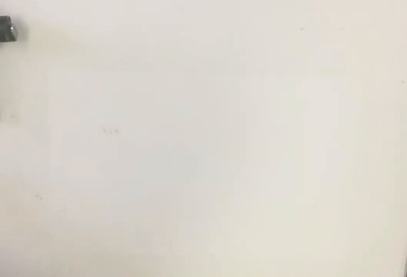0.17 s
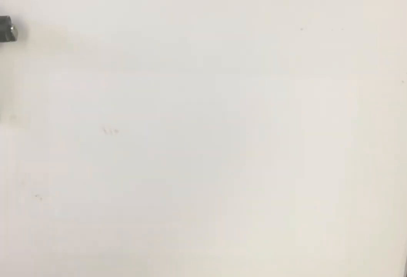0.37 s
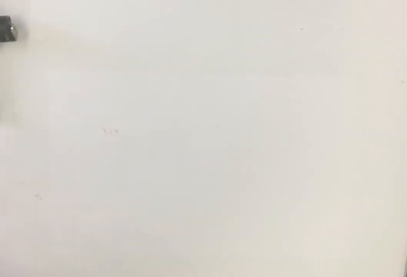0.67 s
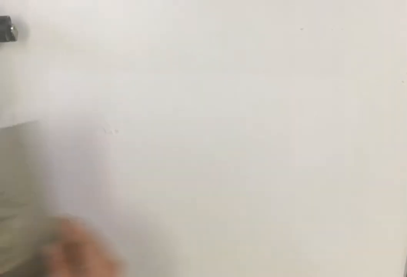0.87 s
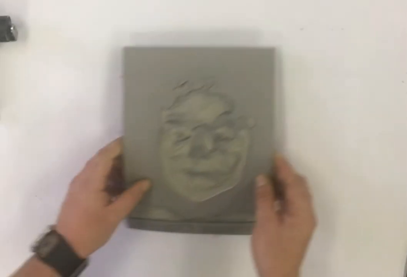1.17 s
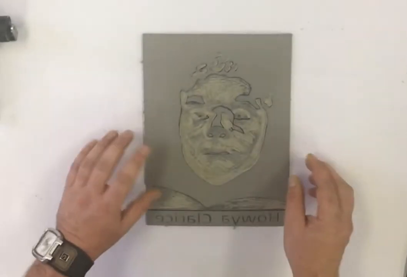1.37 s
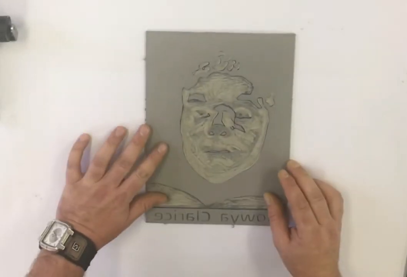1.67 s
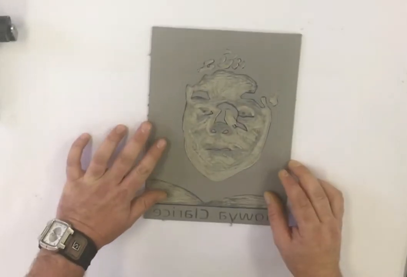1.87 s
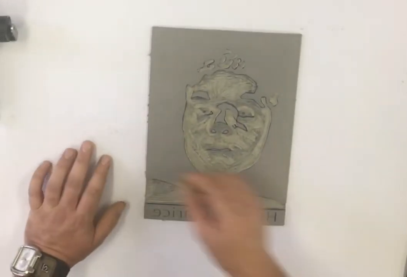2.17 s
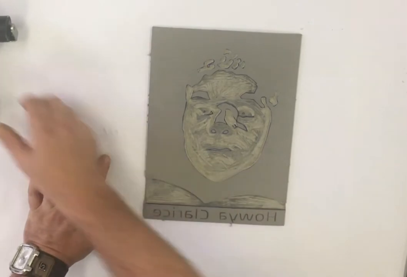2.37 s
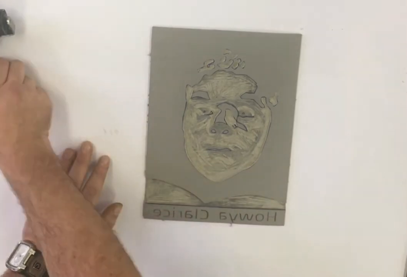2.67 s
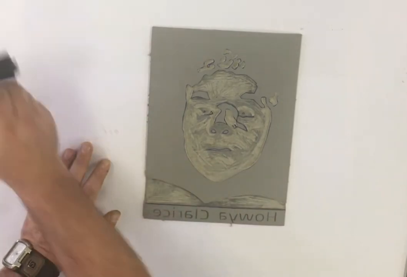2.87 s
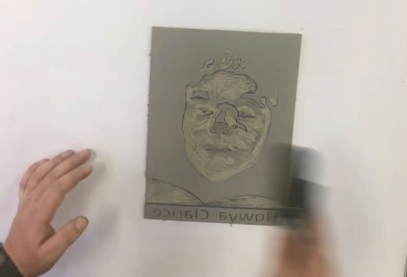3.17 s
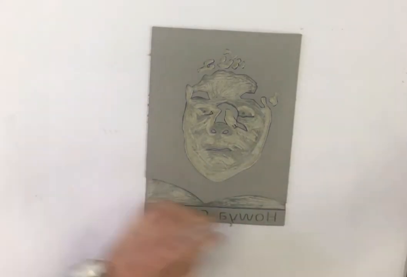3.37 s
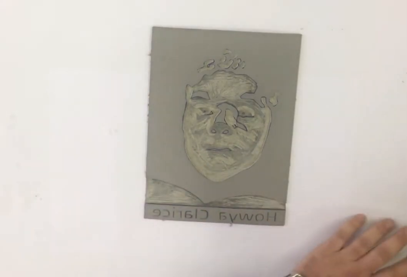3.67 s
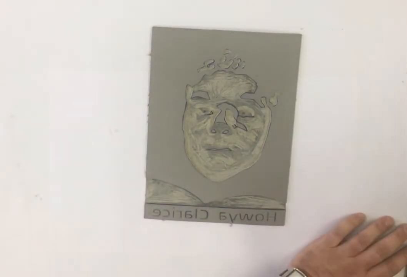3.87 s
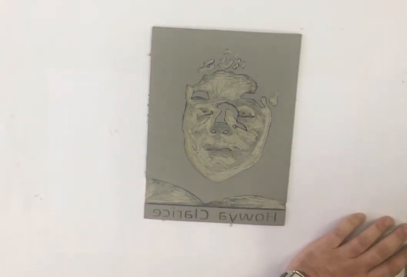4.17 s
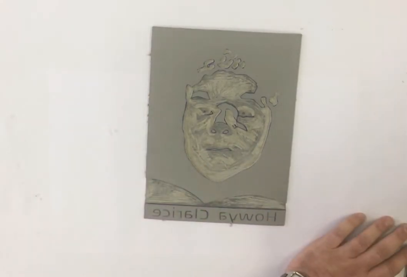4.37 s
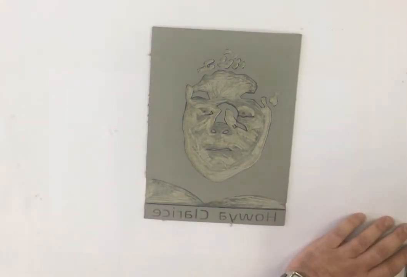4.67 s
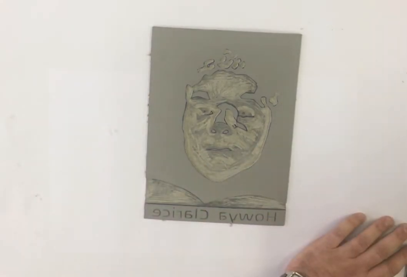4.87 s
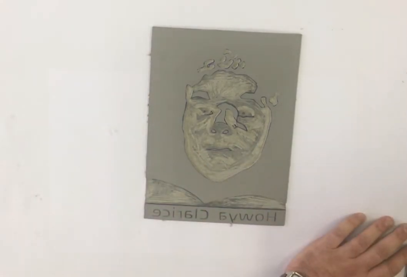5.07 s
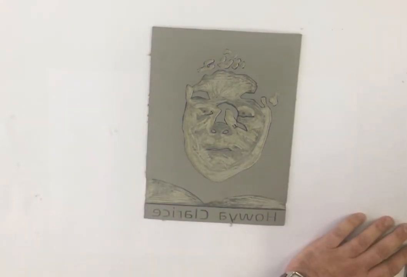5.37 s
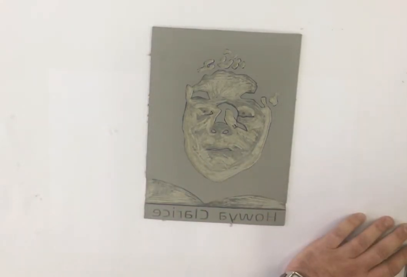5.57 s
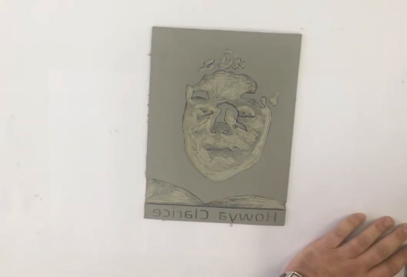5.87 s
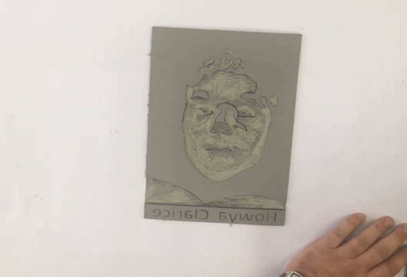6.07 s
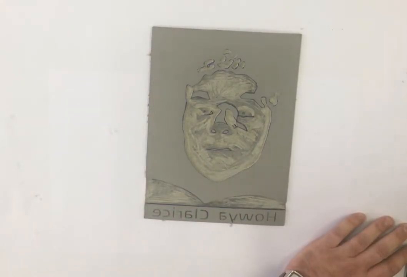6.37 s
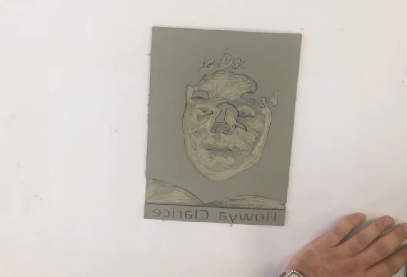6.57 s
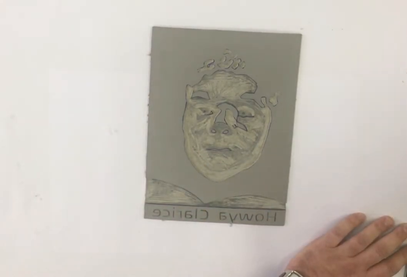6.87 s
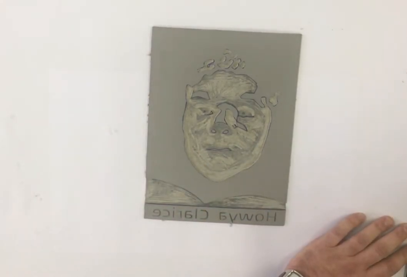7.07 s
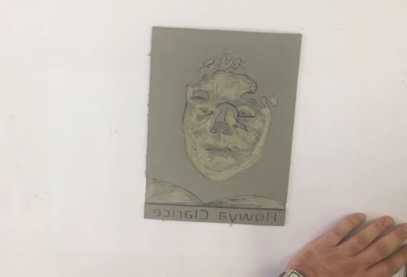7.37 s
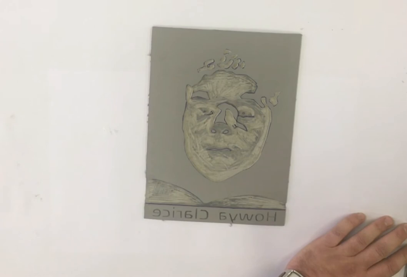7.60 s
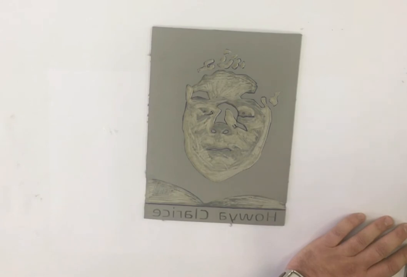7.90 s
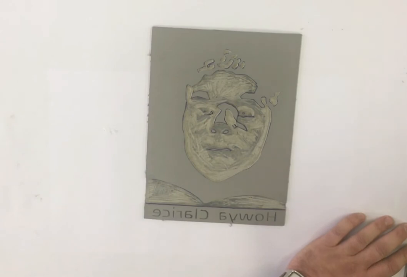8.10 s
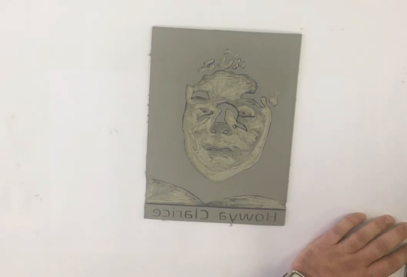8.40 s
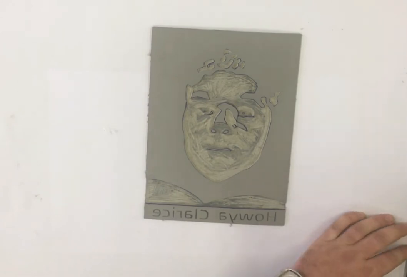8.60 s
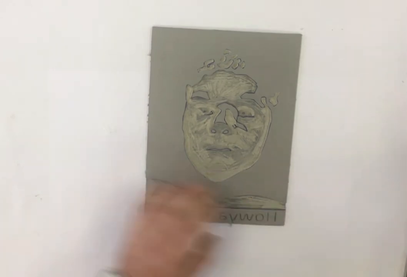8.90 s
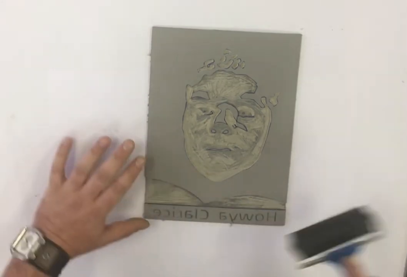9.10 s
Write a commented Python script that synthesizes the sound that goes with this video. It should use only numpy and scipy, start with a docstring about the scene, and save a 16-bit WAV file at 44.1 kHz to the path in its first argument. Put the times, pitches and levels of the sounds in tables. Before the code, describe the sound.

After a ringing metal clack and a soft flop on a workbench, a rubber roller knocks down and rolls through tacky ink in quick strokes.

```python
"""Rolling out printing ink.

A steel tool clacks onto a workbench and rings in its modes. A carved lino plate slides onto paper and
flops flat on a cushion of air. A rubber roller lands on the inking slab and rolls to and fro: threads
of tacky ink snap behind it in a fine sizzle, while its frame murmurs in forced vibration.
One microphone hears it all in a small, live room."""
import sys
import numpy as np
from scipy import signal
from scipy.fft import rfft, irfft, next_fast_len
from scipy.io import wavfile
from scipy.ndimage import map_coordinates

SR = 44100
rng = np.random.default_rng(int(sys.argv[2]) if len(sys.argv) > 2 else 0)


def store_pcm(level_fs):
    """Save levels as 16-bit WAV."""
    pcm = np.round(np.clip(level_fs, -1, 1) * 32767).astype(np.int16)
    wavfile.write(sys.argv[1], SR, np.atleast_2d(pcm).T)


N = 407484
TIME = np.arange(N) / SR
AGE = np.arange(SR) / SR  # time since a blow [s]

# pushes and pulls of the roller in turn, a push first: (start [s], fastest point [s], rest [s],
# relative sizzle level at the start [dB], at the fastest point [dB])
STROKES = [(3.579, 3.65, 3.76, -45.5, -45.0), (3.67, 3.85, 3.92, -41.0, -40.5),
           (3.948, 4.1, 4.14, -37.0, -34.5), (4.157, 4.28, 4.35, -41.0, -37.5),
           (4.377, 4.54, 4.62, -36.0, -35.5), (4.627, 4.69, 4.86, -49.5, -37.5),
           (4.852, 4.98, 5.06, -42.5, -32.0), (5.075, 5.15, 5.31, -51.5, -38.5),
           (5.301, 5.43, 5.5, -45.0, -30.5), (5.578, 5.63, 5.75, -49.0, -35.5),
           (5.764, 5.86, 5.95, -47.0, -32.0), (5.97, 6.04, 6.22, -52.0, -34.5),
           (6.227, 6.38, 6.46, -39.0, -32.5), (6.537, 6.62, 6.85, -48.5, -39.5),
           (6.89, 7.05, 7.12, -39.0, -34.0), (7.445, 7.62, 7.74, -55.0, -42.0),
           (7.74, 7.83, 7.99, -48.5, -35.0), (8.012, 8.16, 8.27, -47.0, -38.5),
           (8.287, 8.38, 8.56, -45.0, -34.0), (8.566, 8.66, 8.78, -54.0, -41.0)]
# spectrum of tacky contact parting: (frequency [Hz], relative density [dB])
TACK_SPECTRUM = [(300, -33.5), (1500, -23), (3000, -17), (4400, -7.5), (5000, -11.5), (6400, -2.5),
                 (7400, -6.5), (9500, -0.5), (10300, -4), (11300, 0.5), (13500, -2.5), (16000, -9.5)]


def rolling(set_off_s=0.012, slowing_db=19, slowing_power=2.03, sag_s=0.022):
    """Amplitude envelope of the sizzle: it follows the roller's speed, building up and falling away."""
    # brief dips within a stroke: (time [s], level change [dB])
    sags = [(3.81, -5.5), (4.04, -4), (4.27, -5), (4.46, -3.5), (6.11, -6.5), (6.31, -5.5), (6.73, -6),
            (6.98, -9.0)]
    strength = np.zeros(N)
    for start, fastest, rest, start_db, fastest_db in STROKES:
        set_off = 1 - np.exp(-np.maximum(TIME - start, 0) / set_off_s)
        build_db = np.interp(TIME, [start, fastest], [start_db, fastest_db])
        slowing = np.clip((TIME - fastest) / (rest - fastest), 0, 10)
        strength += set_off * amp(build_db - slowing_db * slowing ** slowing_power)
    return strength * amp(sum(db * bump(s, sag_s) for s, db in sags))


def ink(sizzle, echo_db=-17, echo_s=0.000402):
    """Shot noise: ink threads snap behind the roller, and faster rolling breaks more of them."""
    speed = np.sqrt(sizzle / sizzle.max())
    threads = coloured(snaps(7000 + 16000 * speed), TACK_SPECTRUM)
    # comb filtering: the reflection off the slab shifts as the roller travels
    lag = echo_s * SR * np.exp(0.286 * wobble(4))
    reflection = amp(echo_db) * map_coordinates(threads, [np.arange(N) - lag])
    uneven_film = amp(0.22 + 0.72 * wobble(70))
    return room(sizzle * uneven_film * unit(threads + reflection), wet_db=-10)


def frame(sizzle, growth=0.65):
    """Forced vibration: rolling shakes the frame, whose murmur grows more gently than the sizzle."""
    # resonances of the frame: (frequency [Hz], bandwidth [Hz], relative level [dB])
    modes = [(198.6, 26, 0.5), (351, 60, -4), (505, 97, -4.5), (814, 43, 0), (900, 95, -5),
             (1028, 125, -4.5), (1220, 270, -8.5), (1680, 540, -13.5), (2410, 460, -14)]
    # brief shudders of roller and bench: (time [s], frequency [Hz], level [dB], half length [s])
    judders = [(3.363, 200, -46, 0.022), (3.446, 218, -45, .01), (3.567, 470, -30.5, 0.0093),
               (3.585, 348, -41.5, 0.048), (4.647, 516, -43, 0.015), (5.147, 350, -51, 0.02),
               (5.654, 847, -49.5, .03), (5.988, 510, -45, 0.021), (6.045, 827, -44.5, 0.015),
               (6.39, 352.1, -51.5, 0.023), (6.946, 342, -48.5, 0.022), (7.457, 195, -46, 0.019),
               (7.887, 193.6, -47, 0.033)]

    def response(hz):
        """Modal superposition: band-pass resonances add with alternating signs."""
        return sum((-1) ** k * amp(db) * 1j * hz * width / (centre ** 2 - hz ** 2 + 1j * hz * width)
                   for k, (centre, width, db) in enumerate(modes))

    murmur = amp(-29.5) * sizzle ** growth * unit(filtered(rng.standard_normal(N), response))
    phase_drift = 1.4 * wobble(90)
    judder = sum(amp(db) * bump(s, length) * np.sin(2 * np.pi * hz * TIME + phase_drift)
                 for s, hz, db, length in judders)
    return room(murmur, wet_db=-7.5) + room(judder, wet_db=-6.5)


def steel_tool(bench_hz=325, bench_t60=0.16):
    """Impact excites free vibration: one end lands, then the other; steel rings and the bench knocks."""
    # the two impacts: (time [s], relative level [dB])
    clacks = [(.1412, -10), (.1508, -1.5)]
    # modes of the tool: (frequency [Hz], relative level [dB], t60 [s])
    modes = [(1297, -8, 0.52), (1470, -9, 0.57), (1561, -8, 0.71), (1879, -9, 0.56), (2089, -12, 0.85),
             (2175, -11, 0.63), (2272, -13, 0.53), (2422, -12, 0.46), (2514, -5, 0.33), (2595, -16, 0.65),
             (2772, -15, 0.81), (2950, 0, 0.22), (3122, -9, 0.56), (3198, -9, 0.67), (3305, -7, 0.49),
             (3375, -9, 0.47), (3494, -12, 0.67), (3714, -16, 0.55), (3806, -20, 0.69), (4113, -13, 0.4),
             (4398, -21, 0.49), (5609, -12, 0.3), (6670, -17, 0.33), (7004, -16, 0.43), (7424, -21, 0.54),
             (7612, -23, 0.56), (8344, -20, 0.45), (8796, -21, 0.43)]
    # spectra of the hard crack and the lingering clatter: (frequency [Hz], relative density [dB])
    crack_spectrum = [(150, -36), (500, -25.5), (750, -13), (1100, -11), (2300, -3.5), (3100, 1.5),
                      (3900, -1), (5000, -12), (5800, -8), (8400, -11.5), (9500, -17), (13000, -22.5),
                      (16000, -32.5)]
    clatter_spectrum = [(150, -27.5), (330, -4.5), (480, -24.5), (700, -10), (850, -17), (1300, 1.5),
                        (2150, -1), (2400, -4.5), (3300, -1), (4200, -12), (5000, -25), (6500, -16.5),
                        (7250, -11), (7800, -17.5), (11000, -31.5), (16000, -51.5)]
    blows, ringing = np.zeros(N), np.zeros(N)
    for s, db in clacks:
        crack = noise(crack_spectrum, size=SR) * fade(0.013)
        knock = amp(-39.5) * np.sin(2 * np.pi * bench_hz * AGE) * fade(bench_t60)
        clatter = noise(clatter_spectrum, size=SR) * (amp(-19.5) * fade(0.16) + amp(-30) * fade(0.96))
        add(blows, s, amp(db) * (crack + knock))
        add(ringing, s, amp(db) * (clatter + amp(-28) * ring(modes, scatter_db=1.5)))
    return room(blows, wet_db=-12) + ringing


def plate(boom_hz=130, boom_t60=0.23, boom_rise_s=0.0047):
    """Air pumping: each flap of the limp sheet slaps the bench and drives a low boom from beneath it."""
    # flaps on the air cushion: (time [s], boom level [dB], slap level [dB])
    flops = [(1.73, -60, -38.5), (1.749, -26.5, -37), (1.795, -34, -43), (1.845, -28.5, -50),
             (1.905, -31.5, -50), (1.935, -55, -45.5), (1.976, -33, -56), (2.035, -34.5, -52.5),
             (2.158, -44, -69)]
    # spectrum of a slap: (frequency [Hz], relative density [dB])
    slap_spectrum = [(60, -22), (130, 1), (330, -2.5), (560, -12.5), (800, -20.5), (2000, -33), (8000, -40),
                     (16000, -45)]
    pump, slaps = np.zeros(N), np.zeros(N)
    for s, boom_db, slap_db in flops:
        add(pump, s, amp(boom_db) * fade(boom_t60) * (1 - np.exp(-AGE / boom_rise_s)))
        add(slaps, s, amp(slap_db) * noise(slap_spectrum, size=SR) * fade(0.26))
    phase = 2 * np.pi * boom_hz * TIME + 1.3 * wobble(18)
    boom = pump * (np.sin(phase) + amp(-15.5) * np.sin(2 * phase))
    return boom + room(slaps, wet_db=-5)


def knocks():
    """Impulsive excitation: a thing set down clicks, and the modes of the bench answer with a thud."""
    # light and heavy impacts: (time [s], relative click level [dB], relative thud level [dB])
    impacts = [(0.109, -43, -32.5), (1.217, -47, -38.5), (1.2655, -44, -37.5), (2.9302, -37, -52),
               (2.9437, -42.5, -54), (2.968, -43.5, -48), (3.285, -56, -47), (3.5345, -28.5, -47),
               (3.545, -32, -44), (3.5555, -20.5, -19.5), (3.5651, -40, -29), (7.098, -40, -43),
               (7.432, -31.5, -32), (7.44, -44, -33.5), (8.707, -42.5, -48), (9.119, -44, -51),
               (9.1555, -56, -58), (9.181, -51, -60), (9.185, -53, -51)]
    # spectrum of hard contact: (frequency [Hz], relative density [dB])
    click_spectrum = [(200, -17), (800, -7), (1400, -4.5), (2200, 2), (3000, -2.5), (3600, -4), (4400, 0.5),
                      (5100, -9), (9000, -16.5), (16000, -26)]
    # modes of slab and bench: (frequency [Hz], relative level [dB], t60 [s])
    bench_modes = [(188, -7.5, .22), (294, -4, 0.24), (336, -5.5, .3), (400, -13.5, .1), (480, -5.5, 0.061),
                   (522, -10.5, .35), (630, -5.5, .16), (811, -3.5, 0.11), (990, 1, 0.095),
                   (1045, -5.5, .09), (1190, -2, 0.088), (1443, -9.5, 0.079), (2030, -6, 0.066),
                   (2530, -11, .04)]
    clicks, thuds = np.zeros(N), np.zeros(N)
    click_decay = fade(0.017) + amp(-19.5) * fade(0.09)
    for s, click_db, thud_db in impacts:
        add(clicks, s, amp(click_db - 3) * noise(click_spectrum, size=SR) * click_decay)
        add(thuds, s, amp(thud_db - 10) * ring(bench_modes, scatter_db=1) * fade(0.22))
    return room(clicks, wet_db=-7.5) + room(thuds, wet_db=-9.5)


def squelch(s=3.566, half_length_s=0.0076):
    """Squeeze flow: the landing roller presses wet ink out from under it."""
    # spectrum of squeezed ink: (frequency [Hz], relative density [dB])
    spectrum = [(1500, -20), (4000, -10), (5700, -6), (6350, 4.5), (7300, -2), (8400, 1.5), (11000, -7),
                (16000, -17)]
    return room(amp(-23.5) * bump(s, half_length_s) * coloured(snaps(20000), spectrum), wet_db=-15)


def crackles(breakaway_db=-42, lag_s=0.008, rise_s=0.001, breakaway_t60=0.028):
    """Adhesion fails: small contacts peel apart under the hands, and under the roller at each push."""
    # skin brushing paper: (time [s], level [dB], rise time [s], t60 [s])
    brushes = [(.026, -59, 0.0018, 0.12), (1.109, -55, .002, 0.22), (1.217, -45.5, .002, 0.082),
               (1.879, -56, .002, .06), (2.088, -52, 0.00093, .03), (2.114, -51, .001, .025),
               (2.418, -56, .001, 0.022), (2.455, -51, .001, 0.019), (2.482, -49.5, .001, .012)]
    breakaways = [(s + lag_s, breakaway_db, rise_s, breakaway_t60) for s, *_ in STROKES[::2]]
    envelope = np.zeros(N)
    for s, db, rise, t60 in list(brushes) + breakaways:
        attack = (TIME - s) / rise
        decay = np.log(1000) * (s - TIME) / t60
        envelope += amp(db) * np.exp(np.minimum(attack, decay))
    return room(envelope * coloured(snaps(13000), TACK_SPECTRUM), wet_db=-8.5)


def sliding():
    """Friction noise: paper fibres catch under the tool, plate and hands that slide across them."""
    # movements over the paper: (time [s], rub level [dB], swish level [dB], half length [s])
    slides = [(0.055, -52, -58, 0.028), (0.127, -47, -63, 0.027), (0.708, -62.5, -70, 0.036),
              (0.96, -61.5, -80, 0.15), (1.25, -57.5, -56.5, 0.049), (1.526, -51, -60.5, 0.094),
              (1.756, -56.5, -62.5, 0.078), (2.14, -63, -74, 0.11), (2.427, -64.5, -70, 0.12),
              (3.065, -77, -62.5, 0.069), (3.229, -73, -58, 0.019), (9.22, -60, -63, 0.058)]
    # spectra of the low rub and the high swish: (frequency [Hz], relative density [dB])
    rub_spectrum = [(150, -14.5), (350, -1), (600, -9.5), (1200, -8.5), (1900, -8), (3500, -17.5),
                    (7000, -33.5), (16000, -51)]
    swish_spectrum = [(1500, -18.5), (5200, -4), (6400, -0.5), (9000, -3), (12000, -4.5), (16000, -11)]
    rub_envelope = sum(amp(db) * bump(s, length) for s, db, _, length in slides)
    swish_envelope = sum(amp(db) * bump(s, length) for s, _, db, length in slides)
    rub = rub_envelope * noise(rub_spectrum) * amp(2.1 * wobble(44))
    swish = swish_envelope * coloured(snaps(9000), swish_spectrum)
    return rub + swish


def clink(s=9.118):
    """Free vibration: the wire handle rings briefly as the roller is laid aside."""
    # modes of the handle: (frequency [Hz], relative level [dB], t60 [s])
    modes = [(1464, -0.5, 0.2), (2153, -11, .19)]
    track = np.zeros(N)
    add(track, s, amp(-52) * ring(modes, scatter_db=3))
    return room(track, wet_db=-8)


def background():
    """Ambient noise: still workshop air and a faint hum; late on, a distant machine swells up."""
    # partials of the hum and the machine: (frequency [Hz], level [dB]), the machine's before its swell
    hum_partials = [(49, -63), (64.6, -73), (118.4, -68), (242, -76.5)]
    machine_partials = [(393, -67), (452, -61.5), (565, -64.5), (745, -65.5), (1491, -70.5)]
    # spectra of the air and the machine: (frequency [Hz], relative density [dB])
    air_spectrum = [(20, -51), (33, -18), (48, -3.5), (70, -4), (100, -4.5), (163, -11.5), (241, -9.5),
                    (399, -18), (800, -22), (1570, -28.5), (3440, -37), (4540, -37), (16000, -46)]
    machine_spectrum = [(100, -12), (250, -3), (480, -5), (900, -12), (1700, -17.5), (4000, -29),
                        (16000, -58.5)]
    # swell of the machine: (time [s], gain [dB])
    swell = [(7.4, -24), (8.3, -1), (8.9, 1.5), (9.24, -1.5)]
    machine = level(swell) * (tones(machine_partials) + amp(-60.5) * noise(machine_spectrum))
    return amp(-55.5) * noise(air_spectrum) + tones(hum_partials) + machine


def room(x, wet_db, build_up_s=0.0018):
    """Reverberation: the direct sound plus a diffuse tail whose treble dies first."""
    # reverberation time of the room: (frequency [Hz], t60 [s])
    decay_times = [(150, .5), (500, 0.86), (1500, 1), (3300, 0.76), (7200, 0.65), (11000, 0.45),
                   (16000, 0.34)]
    hz, t, spectrogram = signal.stft(rng.standard_normal(SR), SR, nperseg=256)
    decay = np.exp(-np.log(1000) * t / along(decay_times, hz)[:, None])
    tail = signal.istft(spectrogram * decay, SR, nperseg=256)[1][:SR]
    tail *= 1 - np.exp(-AGE / build_up_s)
    return x + amp(wet_db) * signal.fftconvolve(x, tail / np.linalg.norm(tail))[:N]


def ring(modes, scatter_db):
    """Modal superposition: damped sinusoids with new strengths and phases at every blow."""
    return sum(amp(db + scatter_db * rng.normal()) * fade(t60)
               * np.sin(2 * np.pi * (hz * AGE + rng.random())) for hz, db, t60 in modes)


def snaps(per_second):
    """Shot noise: tiny random impulses of uneven size, at rms 1."""
    chance = np.clip(per_second / SR, 0.1, 1)
    sizes = rng.standard_normal(N) * amp(2 * rng.standard_normal(N))
    return unit(sizes * (rng.random(N) < chance) / np.sqrt(chance))


def tones(partials, waver=1.3):
    """Phase modulation: tones waver together, the higher ones more."""
    drift = waver * wobble(8.2)
    return sum(amp(db) * np.sin(2 * np.pi * hz * TIME + drift * np.sqrt(hz / 200)) for hz, db in partials)


def noise(spectrum, size=N):
    """Gaussian noise with the given spectrum, at rms 1."""
    return coloured(rng.standard_normal(size), spectrum)


def coloured(x, spectrum):
    """Spectral shaping of x, at rms 1."""
    return unit(filtered(x, lambda hz: amp(along(spectrum, hz))))


def filtered(x, response):
    """Linear filtering: the spectrum of x times a frequency response."""
    size = next_fast_len(len(x) + SR // 4)
    return irfft(rfft(x, size) * response(np.fft.rfftfreq(size, 1 / SR)), size)[:len(x)]


def fade(t60):
    """Exponential decay after a blow, 60 dB in t60 seconds."""
    return np.exp(-np.log(1000) * AGE / t60)


def bump(s, half_length_s):
    """Gaussian envelope around time s."""
    distance = (TIME - s) / half_length_s
    return np.exp(-np.minimum(distance ** 2, 20))


def wobble(rate):
    """Smooth random modulation, rate knots a second."""
    return map_coordinates(rng.standard_normal(int(N * rate / SR) + 4), [TIME * rate])


def level(rows):
    """Gain envelope from (time [s], level [dB]) rows, silent outside them."""
    s, db = np.transpose(rows)
    return amp(np.interp(TIME, s, db, left=-120, right=-120))


def along(points, hz):
    """Interpolation of (frequency [Hz], value) points on a logarithmic frequency axis."""
    frequencies, values = np.transpose(points)
    return np.interp(np.log(hz + 1), np.log(frequencies), values)


def add(track, s, sound):
    """Superposition of a sound onto the track at time s."""
    start = round(s * SR)
    track[start:start + len(sound)] += sound[:N - start]


def amp(db):
    """Decibels to amplitude ratio."""
    return 10 ** (np.asarray(db) / 20)


def unit(x):
    """Normalisation to rms 1."""
    return x / np.sqrt(np.mean(x ** 2) + 1e-20)


def scene():
    """Superposition: all sources add at one microphone, alike in both channels."""
    handling = steel_tool() + knocks() + plate() + sliding() + crackles()
    sizzle = rolling()
    roller = squelch() + ink(sizzle) + frame(sizzle) + clink()
    mono = handling + roller + background()
    return np.array([mono, mono])


def record(dry):
    """Clipping and band limiting: the signal stops at full scale and its top treble is cut steeply."""
    top_hz = 15950
    roll_off = lambda hz: 1 / np.sqrt(1 + (hz / top_hz) ** 300)
    return np.array([filtered(x, roll_off) for x in np.clip(dry, -1, 1)])


dry = scene()
out = record(dry)
store_pcm(out)
```